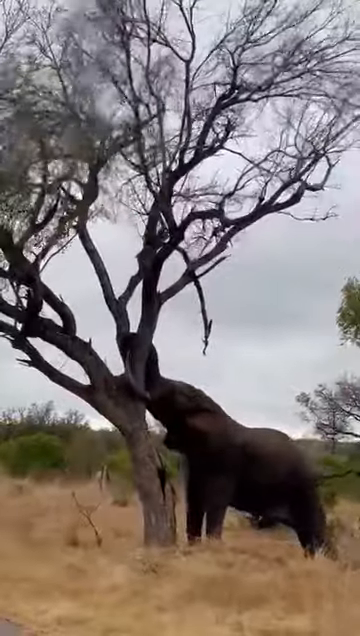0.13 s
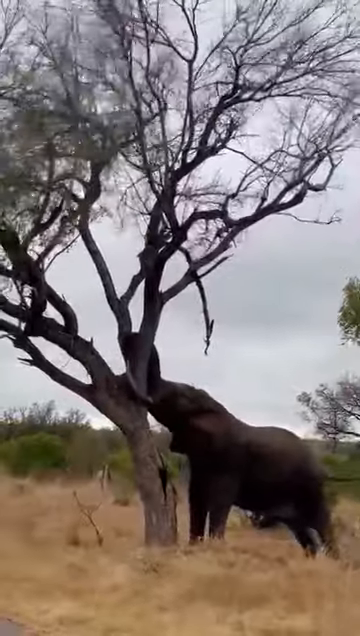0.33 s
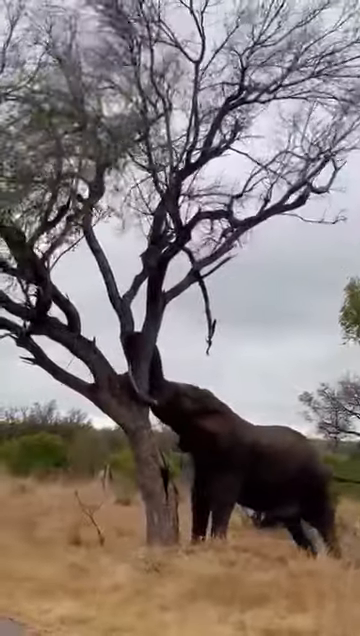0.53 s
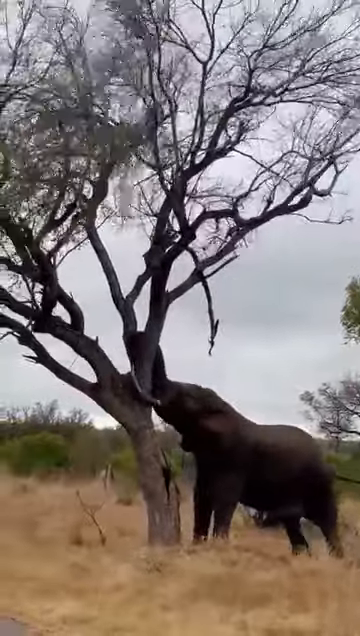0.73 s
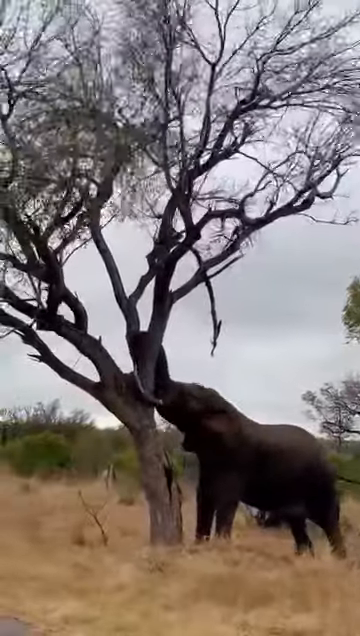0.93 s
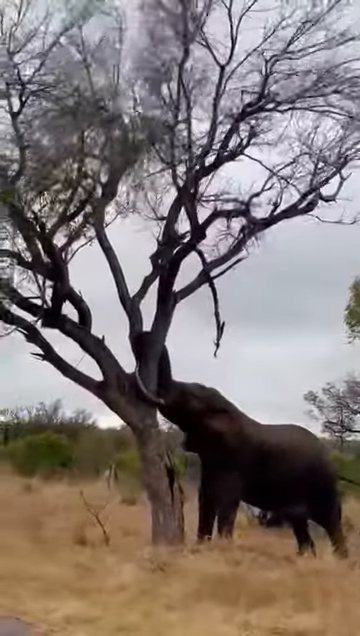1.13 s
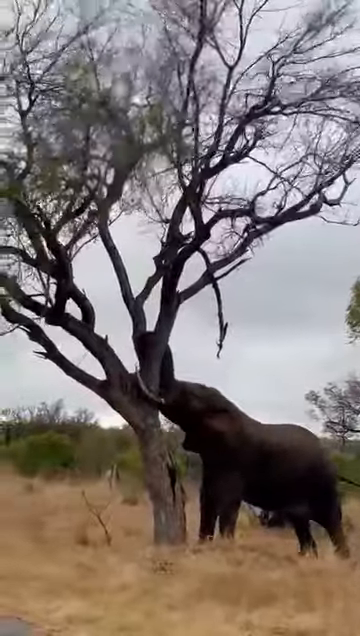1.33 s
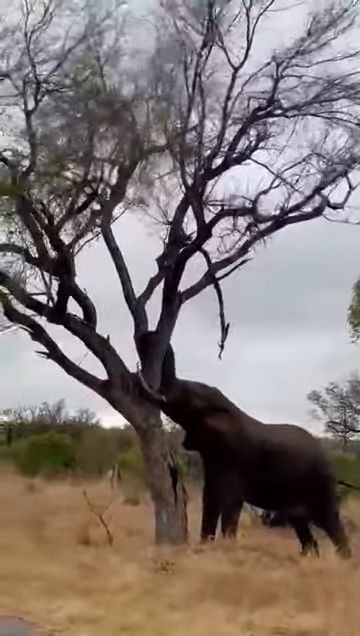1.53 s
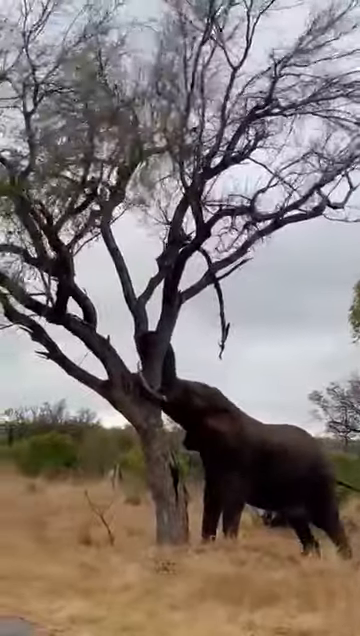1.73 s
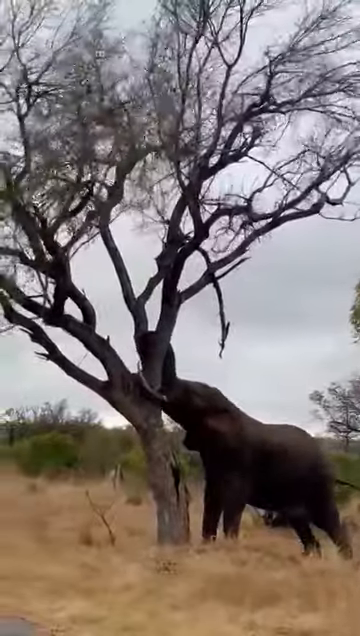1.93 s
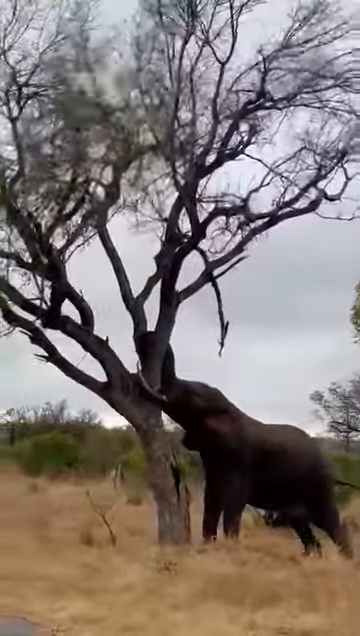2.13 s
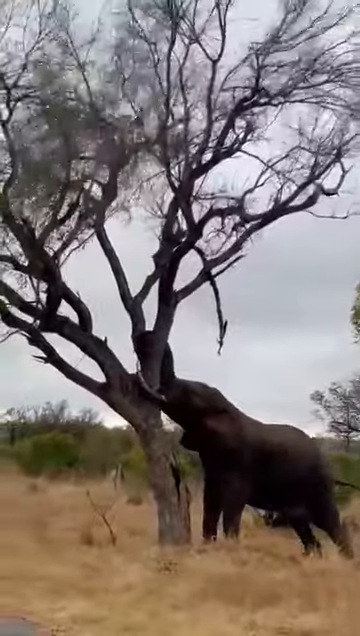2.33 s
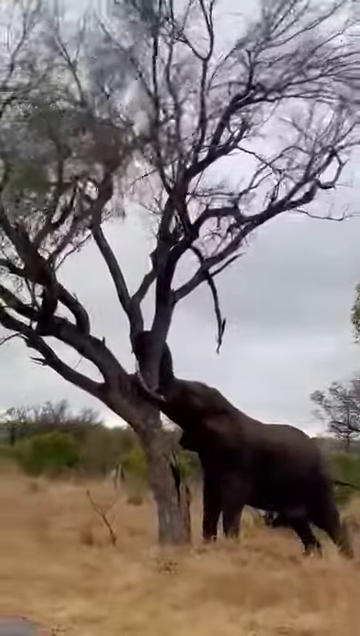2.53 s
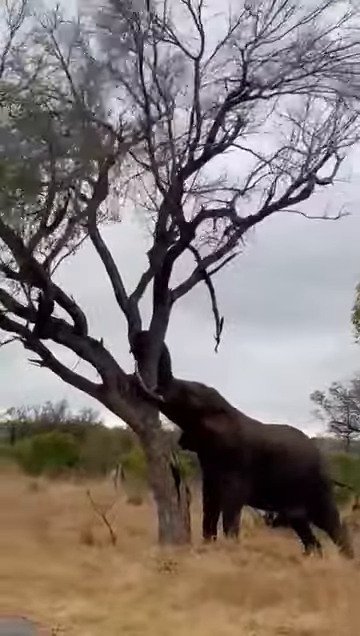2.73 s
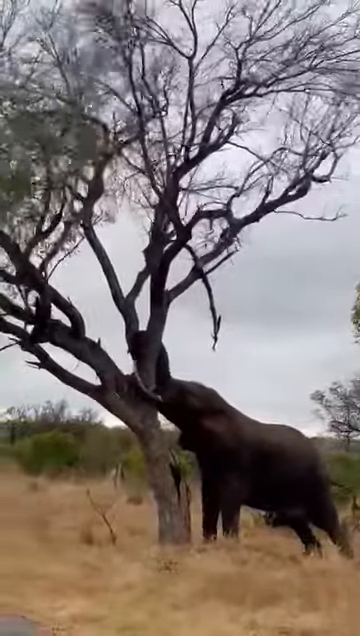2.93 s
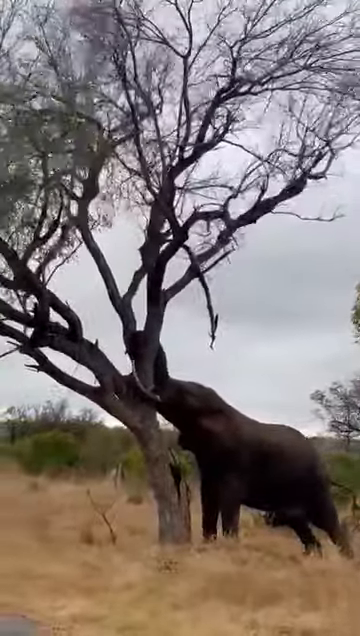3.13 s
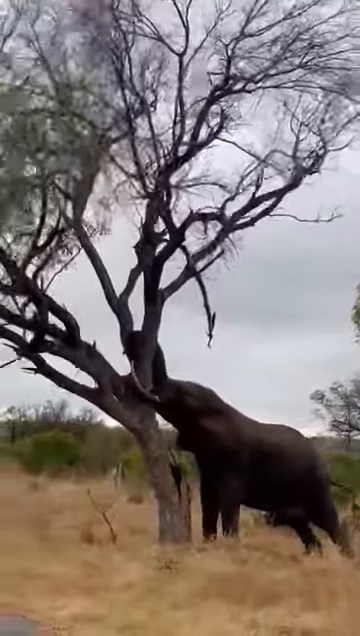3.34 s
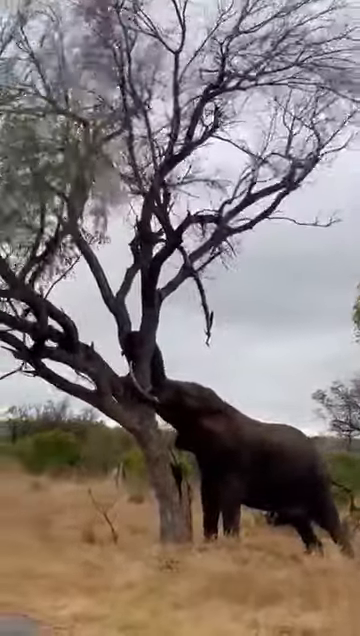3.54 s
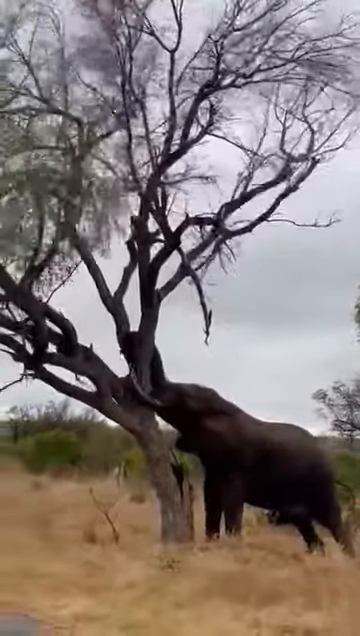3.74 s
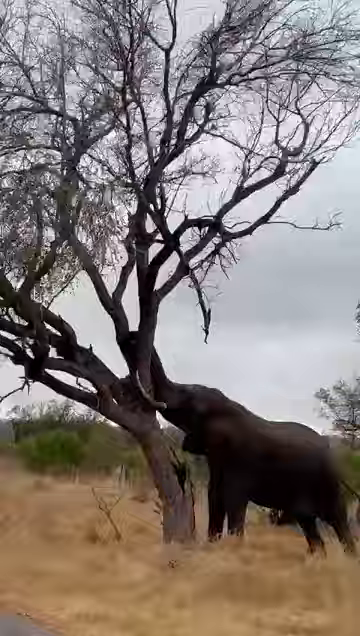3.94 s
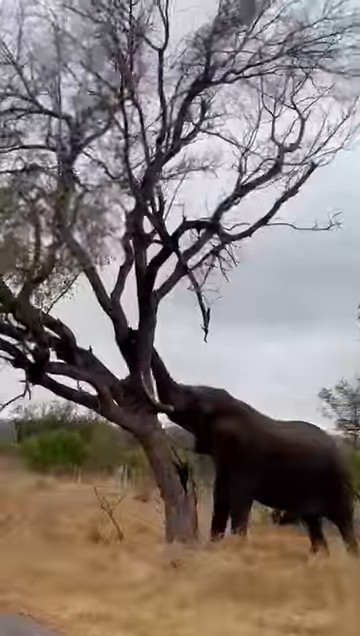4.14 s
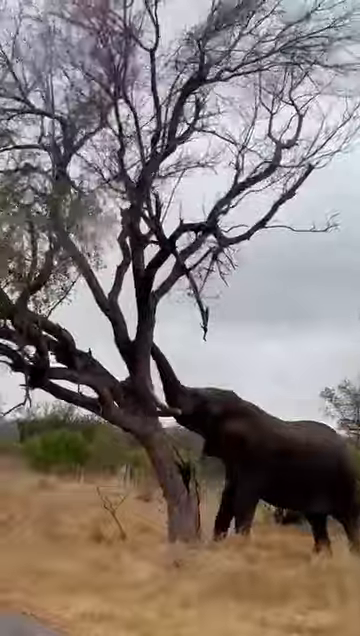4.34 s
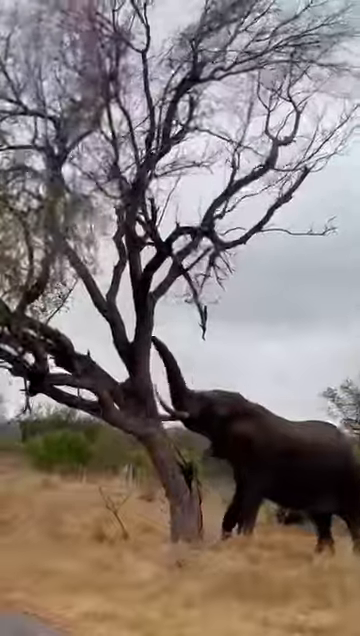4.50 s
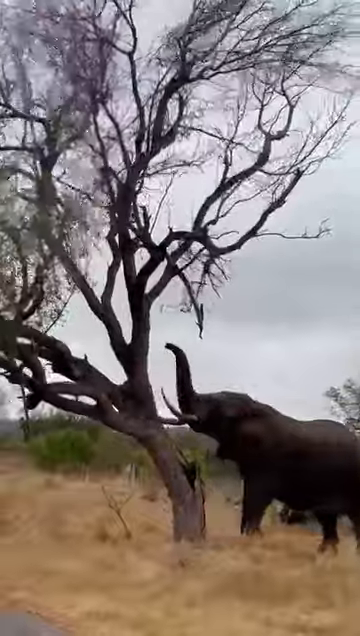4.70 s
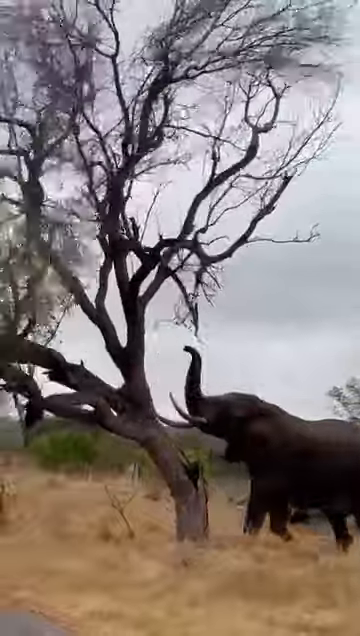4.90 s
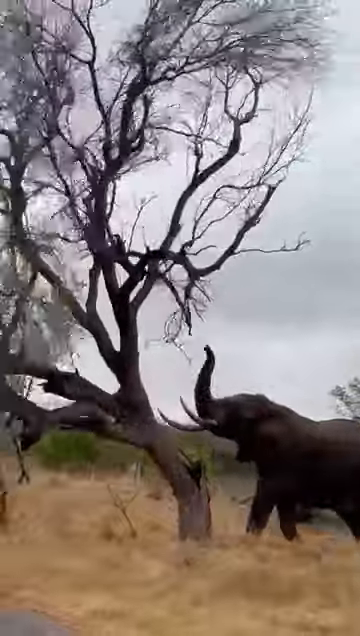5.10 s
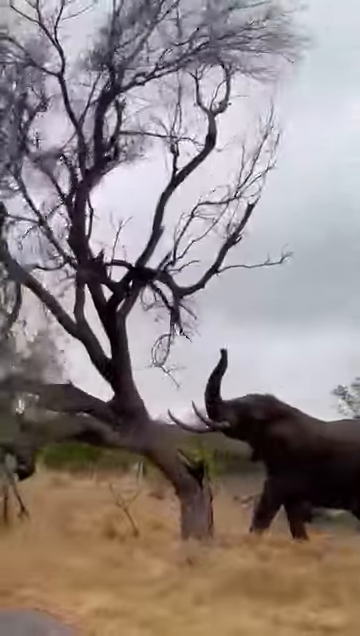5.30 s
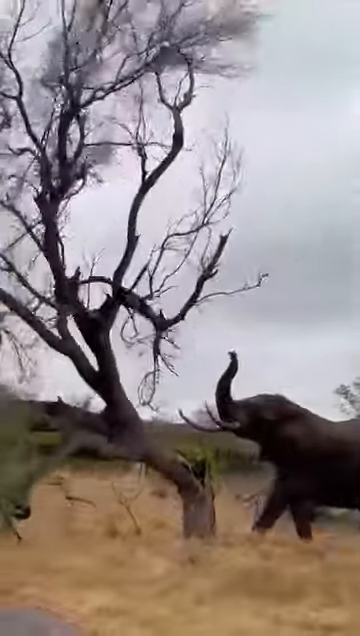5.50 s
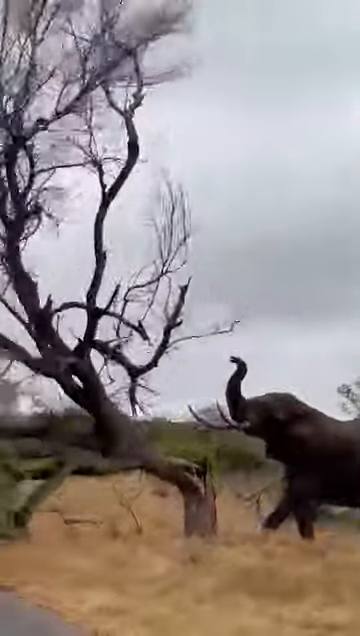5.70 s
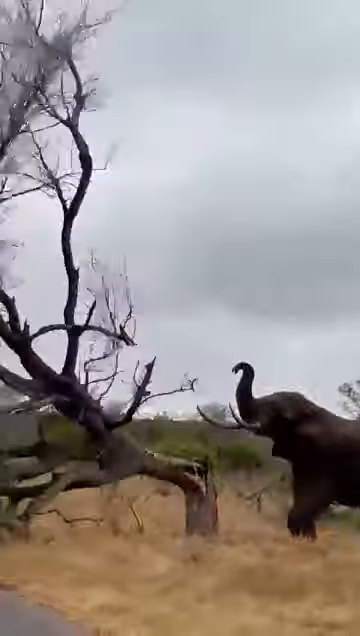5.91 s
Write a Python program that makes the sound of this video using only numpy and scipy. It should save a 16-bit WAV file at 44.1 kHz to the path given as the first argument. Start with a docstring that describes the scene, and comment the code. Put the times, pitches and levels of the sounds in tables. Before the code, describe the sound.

Outdoors, strained wood creaks, then splinters in a growing run of sharp snaps and thuds as a dry tree topples.

```python
"""Open grassland: an elephant pushes over a dead tree. The bent trunk creaks and groans in stick-slip
pulses and splits in slow jerks. Then its fibres snap, faster and louder; each snap is followed by a
falling thud as bending waves run along the wood. Splinters crackle between the snaps, the dry crown
sweeps down into the grass and limbs strike the ground."""
import sys
import numpy as np
from scipy import signal
from scipy.fft import rfft, irfft
from scipy.io import wavfile
from scipy.ndimage import uniform_filter1d

SR = 44100
rng = np.random.default_rng(int(sys.argv[2]) if len(sys.argv) > 2 else 0)


def output_pcm(signal):
    """Save a mono or channel-first signal as 16-bit PCM at the path in sys.argv[1].

    Samples are clipped to [-1, 1] before scaling.
    """
    pcm = np.clip(np.atleast_2d(signal).T, -1, 1) * 32767
    wavfile.write(sys.argv[1], SR, np.round(pcm).astype(np.int16))


N = 262836
SIZE, LEAD = 8192, 128  # samples: one short sound, pre-roll of a snap
TIME_S = np.arange(N) / SR
AGE_S = TIME_S[:SIZE]
FREQ_HZ = np.maximum(np.arange(SIZE // 2 + 1) * SR / SIZE, 1)
CLICK = signal.unit_impulse(SIZE) * np.sqrt(SR / 100)  # 0 dB over 10 ms

# Fibre breaks. Each row: time in seconds, pitch in Hz, snap in dB, splinters in dB, thud in dB.
BREAKS = [(.0104, 1900, -38.5, -45.5, -39), (.0466, 2400, -46, -49, -46), (.1238, 3420, -47.5, -47, -63),
          (.1408, 2380, -45, -41.5, -38.5), (.1549, 2400, -55, -73, -62), (.7999, 2570, -37.5, -48.5, -55),
          (2.7865, 1730, -50.5, -64, -79), (2.8159, 2360, -31, -40.5, -48), (2.8285, 2280, -53, -64, -72),
          (2.9365, 3440, -50, -60, -68), (2.959, 3280, -45, -51, -72), (2.9918, 3400, -47, -38, -71),
          (3.0104, 2020, -35, -44, -44), (3.0502, 2560, -38.5, -38.5, -51), (3.111, 3020, -36.5, -37, -44),
          (3.133, 3240, -35, -52, -45), (3.1472, 2440, -26.5, -32, -29), (3.1742, 2650, -53, -33.5, -34),
          (3.2097, 2570, -40, -42, -55), (3.2213, 2100, -54, -40, -40), (3.251, 2380, -32.5, -50, -33.5),
          (3.2834, 2520, -31.5, -37.5, -39), (3.2955, 2900, -49, -61, -60), (3.3522, 2880, -46, -56, -68),
          (3.3768, 3130, -37.5, -43, -46.5), (3.3917, 2780, -43, -55, -46), (3.4172, 2440, -34, -62, -44),
          (3.4471, 2050, -30.5, -52, -37.5), (3.4822, 2580, -42.5, -49, -72),
          (3.5379, 3840, -37, -40.5, -76), (3.5882, 2680, -44.5, -45, -42), (3.6146, 2590, -40, -46, -48),
          (3.6354, 1900, -41, -37, -41.5), (3.6519, 2700, -24, -35, -37.5), (3.6762, 2840, -37, -49, -55),
          (3.7032, 2510, -31.5, -45, -40.5), (3.743, 2460, -44, -57, -70),
          (3.7915, 1880, -20.5, -36, -31.5), (3.85, 2090, -40, -41.5, -47.5), (3.908, 2370, -41, -44, -46),
          (3.928, 1820, -36.5, -40, -69), (3.9791, 2700, -38, -60, -41.5), (4.0174, 3630, -38, -59, -43),
          (4.0346, 2950, -42, -42, -52), (4.091, 2600, -56, -40, -47), (4.113, 3160, -25, -38, -32),
          (4.168, 2030, -43, -38, -44), (4.2208, 2600, -28, -30.5, -38), (4.2316, 2650, -28, -55, -38),
          (4.266, 2600, -20.5, -55, -25), (4.2923, 2970, -62, -62, -53), (4.3162, 2160, -18, -58, -28.5),
          (4.3744, 3000, -44, -55, -72), (4.4288, 3180, -25.5, -30, -34), (4.4901, 2620, -29, -32.5, -41),
          (4.526, 2170, -38, -43, -46), (4.5696, 2050, -26, -36.5, -32), (4.5795, 2100, -30, -38, -44),
          (4.5971, 1550, -27.5, -37, -37), (4.6347, 2300, -22.5, -26, -32.5), (4.6744, 2500, -21, -45, -32),
          (4.688, 1820, -15, -19.5, -28.5), (4.699, 2200, -21, -35, -34), (4.7094, 2250, -32, -56, -38),
          (4.7651, 2430, -34, -36, -39), (4.805, 2780, -33, -43, -41), (4.8808, 2420, -29.5, -42, -27.5),
          (4.9033, 2220, -24.5, -30, -26.5), (4.9246, 2020, -26.5, -37, -33),
          (4.965, 1980, -27.5, -30, -22), (5.022, 3000, -34, -35, -38), (5.0333, 2330, -25.5, -31, -29.5),
          (5.0585, 2730, -40, -49, -39), (5.0996, 2540, -33, -52, -47), (5.1276, 2120, -41, -39, -40),
           (5.158, 2280, -27, -40, -37), (5.1785, 1980, -22.5, -39, -29.5), (5.186, 2350, -28, -47, -30),
          (5.2035, 2370, -39, -55, -38), (5.2304, 2280, -28, -41, -32), (5.2499, 1530, -33, -27, -38),
          (5.2764, 2620, -35, -47, -31), (5.2959, 1960, -33, -31, -25.5), (5.306, 2740, -24.5, -28.5, -22),
          (5.335, 2840, -29, -38, -29), (5.3472, 1970, -39, -48, -39), (5.3708, 2490, -27.5, -35, -26),
          (5.3855, 2240, -18, -25, -12), (5.392, 1690, -23, -28.5, -20.5), (5.410, 2050, -29, -38, -19.5),
          (5.435, 2930, -53, -57, -36), (5.4605, 1970, -25.5, -47, -30.5), (5.4805, 2160, -30, -41, -41),
          (5.4897, 2170, -31, -31, -30), (5.5202, 1360, -25, -29, -25.5), (5.5328, 2080, -28, -28, -22),
          (5.543, 3000, -24.5, -29, -25), (5.5535, 1670, -20, -22.5, -6.5), (5.6085, 1470, -34, -37, -47),
          (5.6682, 1590, -26, -36, -32.5), (5.6738, 1400, -27, -50, -49), (5.7012, 4500, -22.5, -29.5, -34),
          (5.7455, 1490, -21, -31, -26.5), (5.835, 2040, -30, -26, -26), (5.844, 1780, -21.5, -30, -20),
          (5.8905, 3150, -25.5, -34, -36), (5.9385, 1180, -20, -19, -22)]


def undb(db):
    """Decibels to gain."""
    return 10 ** (np.asarray(db) / 20)


def unit(x):
    """Scale to rms 1."""
    return x / np.sqrt(np.mean(x ** 2) + 1e-30)


def burst(x, db=0):
    """Scale so that the energy, spread over 10 ms, has this level."""
    return x * undb(db) * np.sqrt(SR / 100 / (np.sum(x ** 2) + 1e-30))


def curve(rows, column=1):
    """One table column, interpolated over time."""
    rows = np.array(rows)
    return np.interp(TIME_S, rows[:, 0], rows[:, column])


def response(colour):
    """Causal frequency response. Each row of a colour: frequency in Hz, gain in dB."""
    hz, db = np.transpose(colour)
    gain = undb(np.interp(np.log(FREQ_HZ), np.log(hz), db))
    cepstrum = irfft(np.log(gain))
    cepstrum[1:SIZE // 2] *= 2
    cepstrum[SIZE // 2 + 1:] = 0
    return np.exp(rfft(cepstrum))


def ring(x, impulse):
    """Convolve with an impulse response."""
    return signal.fftconvolve(x, impulse)[:N]


def coloured(x, colour):
    """Filter by a colour, to rms 1."""
    return unit(ring(x, irfft(response(colour))))


def add(out, start_s, x):
    """Mix in a short sound."""
    i = max(int(start_s * SR), 0)
    out[i:i + len(x)] += x[:max(N - i, 0)]


def grains(count, spread_db):
    """Dense clicks of unequal size."""
    return rng.standard_normal(count) * undb(spread_db * np.minimum(rng.standard_normal(count), 3))


def scatter(t60_s):
    """Decaying swarm of reflections."""
    return burst(rng.standard_normal(SIZE) * np.exp(-np.log(1000) * AGE_S / t60_s))


def walk(rate_hz):
    """Smooth random wander, rms 1."""
    hold = max(int(SR / rate_hz), 1)
    steps = np.repeat(rng.standard_normal(N // hold + 1), hold)
    return unit(uniform_filter1d(uniform_filter1d(steps, hold), hold)[:N])


def bending(cycles, lowest_hz=75):
    """Low bending waves travel slower: frequency f arrives about cycles / f late."""
    return np.exp(-2j * np.pi * cycles * np.arcsinh(FREQ_HZ / lowest_hz))


def tear(rise_s):
    """A fracture gathers speed, peaks at twice rise_s and dies out."""
    return rng.standard_normal(SIZE) * AGE_S ** 2 * np.exp(-AGE_S / rise_s)


def broad_tear(rise_s):
    """Many fibres tear at once: flattened spectrum, no pitch."""
    spectrum = rfft(tear(rise_s))
    return irfft(spectrum / (np.abs(spectrum) + 1e-30) ** .7)


def snap(push, hz, octaves=0.89, steep=3.1):
    """A push rings a fibre bundle's broad, flat-topped resonance, LEAD samples in."""
    band = (1 + (np.log2(FREQ_HZ / hz) / octaves) ** 4) ** (-steep / 2)
    return irfft(rfft(np.roll(push, LEAD)) * band)


def air(hiss_db=-58.5):
    """Faint open-air hiss and a few low buffets."""
    # Each row: centre in seconds, half-width in seconds, level in dB.
    buffets = [(1.608, 0.046, -38), (1.667, 0.066, -41), (1.778, 0.055, -45), (5.867, 0.032, -33),
               (5.9, 0.016, -42)]
    # Each row: frequency in Hz, gain in dB.
    hiss_colour = [(15, -45), (25, -15), (53, -6), (75, -9.5), (137, -12.5), (361, -23), (494, -26),
                   (833, -27), (975, -26), (4940, -36), (6410, -42), (13000, -45.5)]
    buffet_colour = [(20, -30), (50, -5.5), (90, -11), (150, -22.5), (400, -42), (1500, -76)]
    hiss = coloured(rng.standard_normal(N) * undb(0.19 * walk(1.3)), hiss_colour) * undb(hiss_db)
    swell = sum(undb(db) * np.exp(-((TIME_S - s) / width_s) ** 2) for s, width_s, db in buffets)
    return hiss + swell * coloured(rng.standard_normal(N), buffet_colour)


def rustle(centre_s=0.57, width_s=0.1, db=-58):
    """Leaves rustle once as the first push shakes the crown."""
    # Each row: frequency in Hz, gain in dB.
    leaf_colour = [(500, -10), (1600, -5), (3000, 1), (5000, -9), (9000, -20), (13000, -45)]
    swell = undb(db) * np.exp(-((TIME_S - centre_s) / width_s) ** 2)
    return swell * coloured(grains(N, spread_db=2.5), leaf_colour)


def crown(twigs=150, twig_db=-6):
    """Dry twigs brush and snap as the crown comes down."""
    # Each row: time in seconds, level in dB.
    descent = [(4.4, -50), (4.9, -48), (5.25, -48), (5.5, -37.5), (5.65, -35.5), (5.78, -25.5), (5.96, -24)]
    # Each row: frequency in Hz, gain in dB.
    brush_colour = [(150, -7.5), (330, 10), (600, 7.5), (1000, 3), (2000, -0.5), (3500, 2), (6500, -4),
                    (9000, -17), (11000, -39), (13000, -62)]
    start_s = descent[0][0]
    sweep = undb(curve(descent)) * (TIME_S > start_s)
    out = coloured(grains(N, spread_db=1) * undb(0.72 * walk(51)), brush_colour) * sweep
    for earliness, faintness, thinness in rng.random((twigs, 3)):
        i = int((1 - earliness * (1 - start_s / TIME_S[-1])) * (N - 1))
        twig = snap(tear(rise_s=0.00022), hz=1200 * 4 ** thinness)
        add(out, i / SR, sweep[i] * burst(twig, twig_db - 20 * faintness ** 2))
    return out


def landings(peak_cycles=0.67):
    """Heavy limbs hit the ground with a short hollow knock."""
    # Each row: start in seconds, pitch in Hz, level in dB.
    impacts = [(5.7464, 710, -21.5), (5.9395, 630, -17), (5.9422, 308, -10)]
    out = np.zeros(N)
    for start_s, hz, db in impacts:
        knock = np.sin(2 * np.pi * hz * AGE_S) * AGE_S * np.exp(-hz * AGE_S / peak_cycles)
        add(out, start_s, burst(knock, db))
    return out


def stick_slip(rows, colour, modes, grit_db, grit_rise_s, tail_db, t60_s, rasp_db, cycles=0):
    """Wood faces catch and let go; each gritty slip rings trunk and sharp modes, then trails a rasp."""
    drift_hz, jitter_s = 0.596, .00004
    grit_share, grit_above_hz = .55, 450
    rasp_hz, rasp_s = 3120, 0.0068
    out, rate_hz, level_db = np.zeros(N), curve(rows), curve(rows, column=2)
    tail_a, tail_b = scatter(t60_s), scatter(t60_s)
    wood = response(colour) * bending(cycles)
    grit_band = grit_share * FREQ_HZ / np.hypot(FREQ_HZ, grit_above_hz)
    rings = [(rfft(np.sin(2 * np.pi * hz * AGE_S) * AGE_S * np.exp(-np.pi * width_hz * AGE_S)), db)
             for hz, width_hz, db in modes]
    sliding = (TIME_S >= rows[0][0]) & (TIME_S < rows[-1][0])
    slip_count = np.ceil(np.cumsum(rate_hz * sliding) / SR)
    for i in np.flatnonzero(np.diff(slip_count) > 0):
        drift = 2 * np.pi * drift_hz * i / SR  # resonances shift as the trunk bends
        trunk = CLICK + undb(tail_db) * (np.cos(drift) * tail_a + np.sin(drift) * tail_b)
        grit = rfft(burst(tear(grit_rise_s), grit_db)) * grit_band
        bite_db = 1.3 * rng.standard_normal()
        slip = burst(irfft((rfft(trunk) + grit) * wood))
        slip += sum(burst(irfft((rfft(CLICK) + grit) * mode), db + bite_db) for mode, db in rings)
        rasp = snap(grains(SIZE, spread_db=-1) * np.exp(-AGE_S / rasp_s), rasp_hz)
        slip += burst(rasp, rasp_db + 2 * rng.standard_normal())
        start_s = i / SR + jitter_s * rng.standard_normal()
        gain = np.sqrt(SR / rate_hz[i] / SIZE) * undb(level_db[i] + .5 * rng.standard_normal())
        add(out, start_s, unit(slip) * gain)
    return out


def creaks():
    """Tight fibres stick and slip in two creaks."""
    # One table per creak. Each row: time in seconds, slip rate in Hz, level in dB.
    slips = [
        [(.7715, 30.5, -45.5), (.86, 31.5, -43), (.945, 37.5, -44.5), (.955, 52, -42), (1.05, 57.3, -44.5),
         (1.26, 57.6, -44.5)],
        [(2.160, 59.3, -44), (2.23, 59.3, -46.5), (2.305, 59.3, -48)],
    ]
    # Each row: frequency in Hz, gain in dB.
    wood_colours = [
        [(60, -20), (160, -4), (270, 9.5), (410, -10), (600, 1.5), (1050, 2.5), (1600, 2.5), (2300, -5.5),
         (3200, -15.5), (6000, -26.5), (11000, -78)],
        [(60, -9), (120, -16), (200, 7.5), (430, -5), (560, 4.5), (800, -2.5), (1600, 2), (2400, -12.5),
         (3200, -19), (6000, -39), (11000, -80)],
    ]
    # Each row: frequency in Hz, width in Hz, level in dB re the trunk.
    modes = [
        [(1360, 1200, -4)],
        [(1620, 900, -17)],
    ]
    first = stick_slip(slips[0], wood_colours[0], modes[0], grit_db=2, grit_rise_s=0.0015,
                       tail_db=14, t60_s=0.085, rasp_db=-16)
    second = stick_slip(slips[1], wood_colours[1], modes[1], grit_db=11, grit_rise_s=0.00058,
                        tail_db=8.5, t60_s=0.19, rasp_db=-29)
    return first + second


def groan():
    """The split trunk sticks and slips; bending waves smear each low pulse."""
    # Each row: time in seconds, slip rate in Hz, level in dB.
    slips = [(2.3125, 43, -37.5), (2.385, 57, -39.5), (2.5, 59, -40.5), (2.62, 63.4, -43),
             (2.69, 59, -54.5), (2.74, 55, -88)]
    # Each row: frequency in Hz, gain in dB.
    wood_colour = [(50, -25), (110, 0), (185, 1), (390, -11.5), (540, -5.5), (750, -14), (1700, -16.5),
                   (3500, -23), (6500, -31.5), (11000, -51.5)]
    # Each row: frequency in Hz, width in Hz, level in dB re the trunk.
    modes = [(2250, 170, -13), (2684, 460, -9), (3300, 1000, -32)]
    return stick_slip(slips, wood_colour, modes, grit_db=8.5, grit_rise_s=0.00082,
                      tail_db=3, t60_s=0.14, rasp_db=-25, cycles=1.606)


def lurches(rise_s=0.00091, crumble_db=-5, crumble_s=0.022, tail_db=-1):
    """The trunk splits in slow jerks: each a dry, crumbling tear and a short thump."""
    # Each row: start in seconds, tear in dB, thump in dB.
    jerks = [(1.2623, -32, -31), (1.302, -33, -42), (1.3076, -39.5, -35), (1.3376, -36, -34.5),
             (1.344, -38, -39.5), (1.3728, -35.5, -34.5), (1.401, -36, -38), (1.4249, -40, -35),
             (1.448, -39.5, -37), (1.4838, -36, -42), (1.4899, -35.5, -34), (1.519, -36, -36),
             (1.559, -36.5, -39)]
    # Each row: frequency in Hz, gain in dB.
    tear_colour = [(300, -14), (750, -3.5), (950, 3.5), (1250, -4), (1550, 1.5), (3100, -5.5), (4000, -10),
                   (6500, -18), (8500, -34), (12000, -53)]
    body_colour = [(40, -15), (110, -0.5), (200, 1.5), (330, -8.5), (470, -10.5), (560, 2), (720, -21),
                   (2000, -45)]
    out, tearing, body = np.zeros(N), response(tear_colour), response(body_colour) * bending(1.556)
    for start_s, tear_db, thump_db in jerks:
        push = burst(broad_tear(rise_s))
        push += burst(grains(SIZE, spread_db=6) * np.exp(-AGE_S / crumble_s), crumble_db)
        add(out, start_s - LEAD / SR, burst(irfft(rfft(np.roll(push, LEAD)) * tearing), tear_db))
        blow = CLICK + undb(tail_db) * scatter(t60_s=0.22)
        add(out, start_s, burst(irfft(rfft(blow) * body), thump_db))
    return out


def aftermath(times_s, db, build_s=.003, decay_s=0.024):
    """Envelope of unrest: builds quickly before each break, dies away after it."""
    power = np.zeros(N)
    np.add.at(power, np.clip((times_s * SR).astype(int), 0, N - 1), undb(db) ** 2)
    fade = lambda x, s: signal.lfilter([1], [1, -np.exp(-2 / (s * SR))], x + 1e-18)
    return np.sqrt(fade(power, decay_s) + fade(power[::-1], build_s)[::-1])


def splintering(ticks=50, tick_db=-3, shudder_db=-8.5):
    """Small fibres give way under strain and after each break, while the trunk shudders."""
    # Each row: time in seconds, crackle level in dB.
    strain_levels = [(0, -62.5), (1.9, -74.5), (2.88, -79), (3.15, -47), (4.4, -45.5), (5.05, -37),
                     (5.45, -29), (5.96, -49)]
    # Each row: frequency in Hz, gain in dB.
    crackle_colour = [(300, -18), (600, -1.5), (1000, 4), (1600, 4.5), (3000, 4), (4500, -4.5),
                      (6800, -5.5), (9000, -31.5), (13000, -49)]
    shudder_colour = [(30, -23), (70, -8.5), (110, 9), (220, 7), (350, -1), (550, 1), (900, -5.5),
                      (1800, -43.5)]
    mid_splinter_db, mid_thud_db, thud_limit_db = -34.5, -52, -25
    times_s, _, _, splinter_db, thud_db = np.transpose(BREAKS)
    # Breaks above the middling level pass on a share of their extra dB.
    after_crackle_db = -36 + 0.86 * (splinter_db - mid_splinter_db)
    after_shudder_db = -46.5 + 0.7 * (np.minimum(thud_db, thud_limit_db) - mid_thud_db)
    strain = undb(curve(strain_levels))
    crackle = np.hypot(strain, aftermath(times_s, after_crackle_db))
    shudder = np.hypot(strain * undb(shudder_db), aftermath(times_s, after_shudder_db))
    out = coloured(grains(N, spread_db=2) * undb(5.7 * walk(200)), crackle_colour) * crackle
    out += coloured(grains(N, spread_db=8) * undb(0.83 * walk(40)), shudder_colour) * shudder
    for when, size, thickness in rng.random((ticks, 3)):
        i = int(when * N)
        tick = snap(tear(rise_s=0.00016), hz=1500 * 0.75 ** thickness)
        add(out, i / SR, crackle[i] * burst(tick, tick_db + 10 * (size - .5)))
    return out


def fibres(hz, count=4, span_octaves=2.4, decay_cycles=1.8, ring_db=-17):
    """Frequency response of one bundle: a click and short modes scattered around its pitch."""
    modes_hz = hz * 2 ** (span_octaves * ((np.arange(count) + rng.random(count)) / count - .5))
    rings = sum(burst(np.cos(2 * np.pi * f * AGE_S) * np.exp(-f * AGE_S / decay_cycles))
                for f in modes_hz)
    return rfft(CLICK + burst(rings, ring_db))


def cracks(rise_s=0.0005, splinter_s=0.01, bass_db=17, bass_hz=79.5):
    """A fibre bundle tears, splinters follow, and the released trunk knocks and thuds."""
    # Each row: frequency in Hz, gain in dB.
    knock_colour = [(60, -32), (200, 2), (330, -21), (520, 7), (750, -1.5), (1300, 1), (2400, -25),
                    (9000, -61)]
    thud_colour = [(30, -34), (70, -15), (100, 5), (140, 5), (185, 5), (280, 0.5), (450, -6.5), (800, -15),
                   (3000, -75)]
    knock, thud = (np.abs(rfft(burst(irfft(response(c))))) for c in (knock_colour, thud_colour))
    splinter_envelope = np.exp(-AGE_S / splinter_s) * (1 - np.exp(-(AGE_S / 0.003) ** 2))
    out = np.zeros(N)
    for time_s, hz, snap_db, splinter_db, thud_db in BREAKS:
        place = rng.standard_normal()
        splinters = grains(SIZE, spread_db=4.5) * splinter_envelope
        bundle = fibres(hz)
        steep = 2.05 + 0.8 * rng.uniform(-0.32, 1)  # some breaks are dull, some sizzle
        fracture = broad_tear(rise_s)
        for push, db, skirt in ((fracture, snap_db, steep), (splinters, splinter_db, steep - 1)):
            crack = snap(irfft(rfft(push) * bundle), hz, steep=skirt)
            add(out, time_s - rise_s - LEAD / SR, burst(crack, db))
        # Light breaks rattle along the limbs; the heaviest swing the whole trunk, adding bass.
        rattle = undb(np.interp(thud_db, [-30, -10], [-1, -13]))
        heavy = np.interp(thud_db, [-23, -11], [0, 1])
        travel = bending(cycles=1.856 * np.exp(0.309 * rattle * place), lowest_hz=75 * 0.447 ** heavy)
        bass = undb(heavy * bass_db / (1 + (FREQ_HZ / bass_hz) ** 6))
        blow = burst(CLICK + rattle * scatter(t60_s=.035)) / CLICK[0]
        knock_db = snap_db + 0.74 * (thud_db - snap_db) - 4.5
        body = np.hypot(undb(knock_db) * knock, undb(thud_db) * thud)
        add(out, time_s, irfft(rfft(blow) * body * travel * bass))
    return out


def scene():
    """Distant tree straight ahead; grass and bush echo faintly; the treble darts from side to side."""
    # Each row: frequency in Hz, gain in dB.
    side_colour = [(30, -22), (100, -36), (250, -28), (500, -18), (1200, -27), (2200, -19),
                   (4000, -9), (9000, -9)]
    tree = creaks() + groan() + cracks() + splintering() + lurches() + rustle() + crown() + landings()
    echo = (undb(-17) * scatter(t60_s=.08) + undb(-20) * scatter(t60_s=.45)) / CLICK[0]
    mid = tree + ring(tree, echo) + air()
    side = ring(mid, irfft(response(side_colour))) * walk(300)
    return np.array([mid + side, mid - side])


def record(dry):
    """Round the loudest peaks, dull the high treble, cut the top."""
    ceiling, dull_hz, top_hz = 1.05, 8000, 12800
    rounded = ceiling * np.tanh(dry / ceiling)
    dull = signal.sosfilt(signal.butter(3, dull_hz, fs=SR, output="sos"), rounded)
    return signal.sosfilt(signal.ellip(8, .2, 90, top_hz, fs=SR, output="sos"), dull)


dry = scene()
out = record(dry)
output_pcm(out)
```